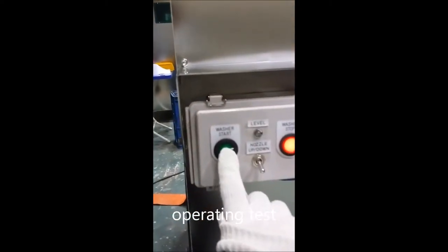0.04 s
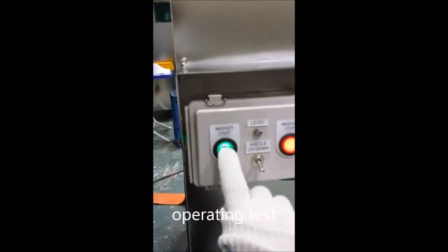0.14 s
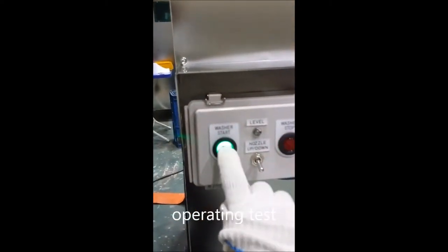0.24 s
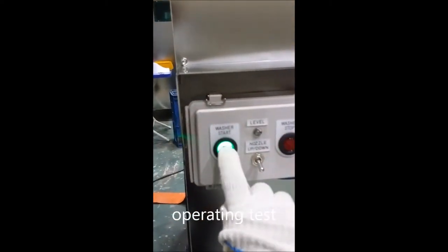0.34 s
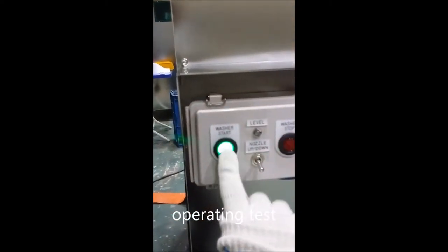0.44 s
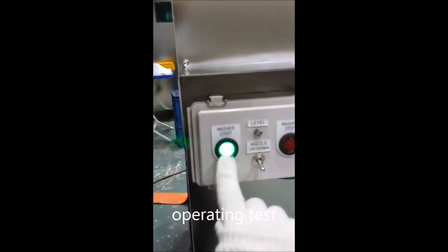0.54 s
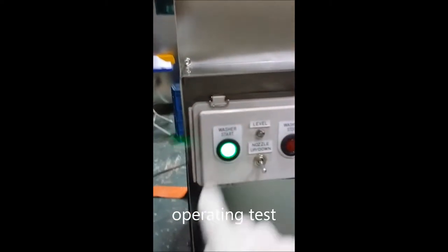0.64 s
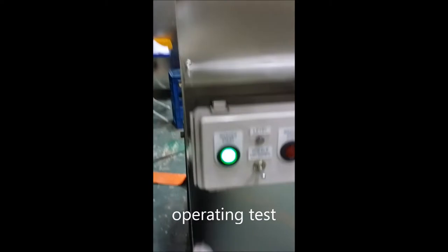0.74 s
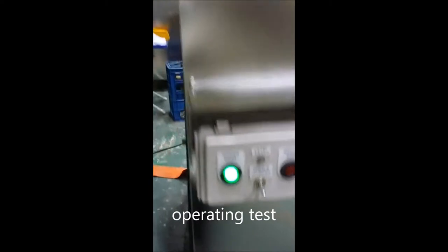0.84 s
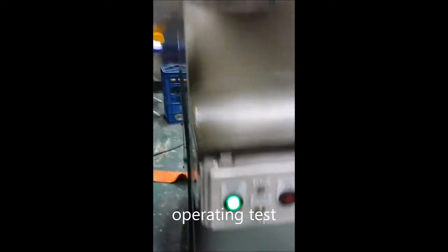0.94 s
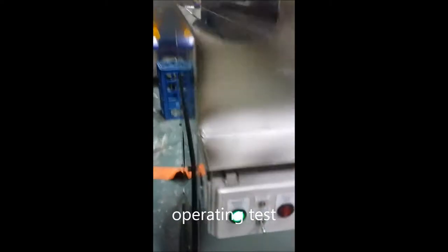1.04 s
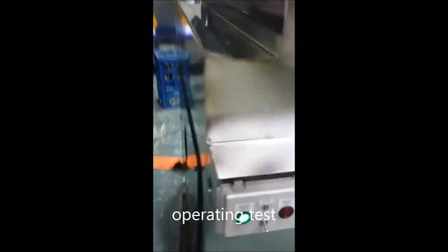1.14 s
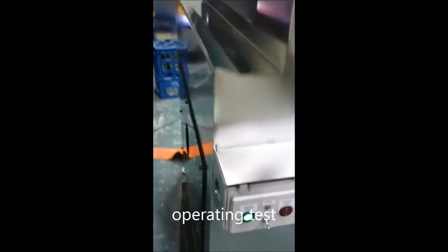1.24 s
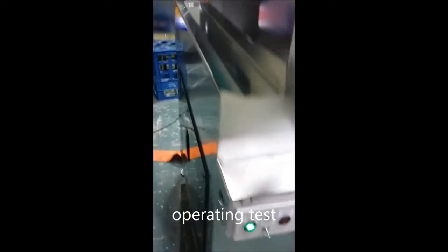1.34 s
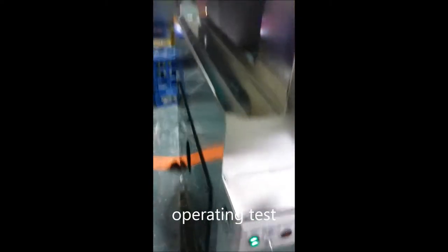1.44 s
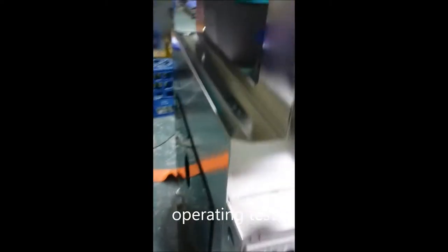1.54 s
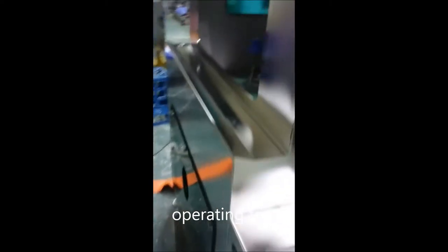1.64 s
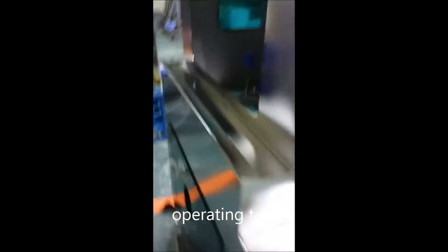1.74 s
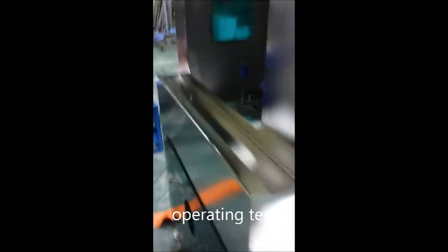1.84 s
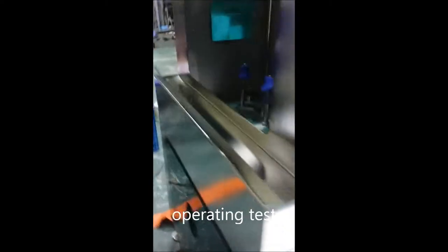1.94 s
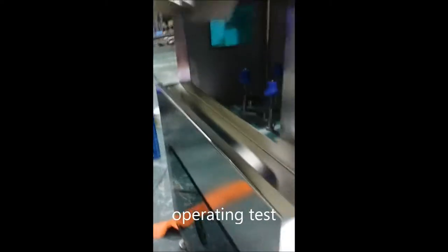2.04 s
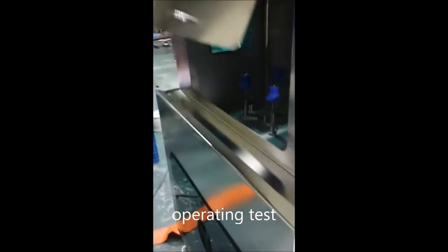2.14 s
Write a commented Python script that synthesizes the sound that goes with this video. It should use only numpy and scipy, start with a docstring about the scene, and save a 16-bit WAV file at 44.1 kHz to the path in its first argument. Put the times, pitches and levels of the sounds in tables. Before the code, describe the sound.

Washing machine switching on: clicking air burst, dull metal bang, then continuous bright spray hiss in a factory

```python
"""A washing machine in a factory hall is switched on.
Its pump motor hums, built from sine waves, over the rumble of the hall, which is shaped noise.
A burst of compressed air escapes (grainy noise) as a valve clicks (noise and taps set off resonances).
A cylinder bangs the steel cabinet, whose panels ring as fading sines.
The spray then hisses steadily: bright noise, cut into bands that each flicker a little."""
import sys
import numpy as np
from scipy import signal
from scipy.fft import rfft, irfft
from scipy.io import wavfile

SR = 44100
rng = np.random.default_rng(int(sys.argv[2]) if len(sys.argv) > 2 else 0)


def unload_audio(sound):
    """Save the sound as a 16-bit wav file, at the path given as the first command line argument."""
    columns = np.transpose(np.atleast_2d(sound))
    # keep every value between -1 and 1, then stretch to whole-number steps
    steps = np.round(np.clip(columns, -1, 1) * 32767)
    wavfile.write(sys.argv[1], SR, steps.astype(np.int16))


N = 97020  # length in samples, 2.2 s

# Main note of the pump hum. Each row: time in seconds, level in dB, left minus right in dB.
HUM = [(0, -38, -4), (.8, -37, -4), (1.07, -38.5, -4), (1.15, -40, -2.5), (1.4, -40, -.5), (1.9, -41, -1),
       (2.2, -39.5, -1)]
# Its overtones. Each row: time in seconds, levels of the 2nd, 3rd, 4th and 5th harmonic in dB before wavering.
OVERTONES = [(0, -67, -58.5, -67, -67), (.8, -63, -63, -61, -55), (1.07, -68, -62, -64, -62),
             (1.15, -55, -52, -68, -62), (1.4, -53.5, -50, -90, -60), (1.55, -65, -52.5, -62, -61),
             (1.72, -76, -52.5, -59, -49), (1.8, -81, -69, -77, -52), (1.95, -70, -53, -70, -63),
             (2.05, -61, -56.5, -64, -52.5), (2.2, -69, -50, -59, -47)]
# A faint second motor. Each row: time in seconds, level in dB.
WHINE = [(0, -58), (1.1, -57.5), (1.4, -64), (2.2, -72)]
HUM_HZ, WHINE_HZ, OVERTONE_WAVER_DB = 250.4, 850.6, 2
HUM_LEAD_S = 0.00024  # the left side runs ahead of the right

# How alike left and right noise are. Each row: pitch in Hz, likeness (1 same, 0 unrelated, below 0 opposed).
LIKENESS = [(60, 1), (130, 0.96), (290, 0.7), (640, 0.13), (1410, -0.12), (3100, 0.076), (6820, 0.15),
            (15000, 0.1)]

# Tone colour of far machinery. Each row: pitch in Hz, relative left and right strength in dB per Hz.
HALL_COLOUR = [(25, -34, -15), (50, -18, -10), (103, -5, -3.5), (185, -11.5, -16), (404, -14, -14.5),
               (696, -18, -16), (1480, -28, -15), (2030, -25, -20.5), (3400, -25, -22.5), (4760, -26, -32),
               (6500, -21.5, -26.5), (7700, -28, -31), (8850, -31, -21), (9900, -31, -32),
               (14700, -32.5, -33), (15400, -65, -60)]
HALL_DB = -43
# Rumble of the running machine. Each row: time in seconds, level in dB before its slow swelling.
RUMBLE = [(.5, -53.5), (.9, -55.5), (1.2, -54), (1.4, -54), (1.6, -58.5), (1.9, -44.5), (2.1, -50.5),
          (2.2, -48)]
# Tone colour of the rumble. Each row: pitch in Hz, relative left and right strength in dB per Hz.
RUMBLE_COLOUR = [(25, -14, 12), (49, -1, 1), (100, 0, -13), (169, 3, 15), (312, 10, 5.5), (496, -43, -16),
                 (1010, -6.5, -18), (2000, -19, -40)]
# Humps added to that colour. Each row: pitch in Hz, width in Hz, relative strength in dB per Hz.
RUMBLE_PEAKS = [(94, 12, -13), (135, 9.6, 11), (164, 10, -8)]
RUMBLE_SWELL_DB = 4.5

# Air burst. Each row: time in seconds, level in dB before graininess, extra dB for its lows, extra dB for its highs.
BURST = [(.1865, -40, -6, -3), (.1975, -38, -6, -6), (.199, -25.5, -12, -10), (.206, -22, -9, -5),
         (.209, -19, 0, 0), (.22, -17.2, 0, 3), (.245, -20, 1, 2), (.26, -22.5, 0, 1), (.28, -26, 0, 0),
         (.31, -30, 1, 0), (.35, -33.5, 2, -2), (.42, -38, 2, -4), (.5, -44, 3, -4)]
# Tone colour of the burst. Each row: pitch in Hz, relative left and right strength in dB per Hz.
BURST_COLOUR = [(496, -16, -7), (1030, -22, -6), (1670, -23, -14), (3050, -12.5, -13), (3570, -4.5, -6),
                (4250, -9, -5), (4970, -0.5, -6), (5600, -7, -10), (6150, 1.5, -15), (7100, -14, -5),
                (7800, 1, -19), (8360, -15, 0.5), (9300, -12, -11), (10700, -12.5, -11), (12300, -13, -15),
                (13800, -14, -14), (14500, -25, -30), (15300, -16, -24), (15800, -40, -40)]
# Broad whistles in the burst. Each row: pitch in Hz, width in Hz, relative strength in dB per Hz.
BURST_WHISTLES = [(6040, 270, -8.5), (4720, 100, -7), (11300, 160, -22)]
BURST_PATCHY_DB, BURST_GRAIN_DB, BURST_FADE_S = .8, 1.2, 0.037

# Valve clicks and knocks, and one low thud. Each row: start in seconds, peak level in dB, pitch of the first
# ring in Hz, time in seconds before the noise dies away, pitch of the second ring in Hz (higher or lower),
# its level in dB against the first ring.
CLICKS = [(.1866, -22, 3900, .002, 10000, -6), (.4453, -17.5, 4400, .004, 12400, -11),
          (.449, -22, 900, .005, 1800, 0), (.1986, -19, 6000, .004, 4000, -3),
          (.2082, -13, 6000, .003, 3900, -2), (.2122, -14, 6200, .001, 8500, -2),
          (.2192, -10, 4300, .002, 6000, -2), (.2385, -12, 6000, .002, 8300, -5),
          (.251, -16, 6100, .002, 4600, -5), (2.07, -34, 123, .03, 280, -18)]
CLICK_CYCLES = 11  # cycles for the first ring to fall by 60 dB; the second ring takes twice as many
CLICK_TAIL_S, CLICK_TAP = .0025, 4  # fading time of the noise; height of the tap

# Blows on the cabinet. Each row: start in seconds, strength in dB.
BLOWS = [(.208, -20), (0.451, -39)]
# Cabinet panels. Each row: pitch in Hz, dB against the blow before chance, seconds to fall by 60 dB
# when left undamped, swelling time in seconds.
CABINET = [(70, -13, 0.62, .01), (89.1, -15, 2.45, 0.018), (104.9, -7.5, 0.79, 0.012),
           (169.7, -19, 0.77, 0.063), (187, -16, 0.94, 0.064), (214, -3, .5, .08), (228, -3, .5, .08),
           (298.5, 2, .65, .025), (452, -10, .7, .04), (549, -12, .6, .03), (357, -12, 0.92, 0.015),
           (695.6, -17.5, 0.68, 0.03), (761, -17.5, 0.46, 0.0047), (872, -21, 0.94, 0.057),
           (1070, -26.5, 0.9, 0.013), (1464, -13, 0.19, 0.0033), (1747, -9.5, 0.25, 0.0066)]
CABINET_PAN_DB, PANEL_CHANCE_DB, PANEL_FLUTTER_DB = -3.5, 1, 2
DAMPED_S, DAMPED_DB, DAMPED_ABOVE_HZ = .432, -9, 150  # the upper panels are damped as the valve resets
# Tone colour of the rattle. Each row: pitch in Hz, relative left and right strength in dB per Hz.
RATTLE_COLOUR = [(40, -30, -1), (101, -2, -16), (230, -3.5, 4.5), (413, -17, -2.5), (537, 2.5, -5.5),
                 (810, -26, -25), (1710, -5, -4.5), (3150, -24, -28)]
RATTLE_DB, RATTLE_SWELL_S, RATTLE_T60_S = -24.5, .012, 1  # T60: seconds to fall by 60 dB

# Spray jets. Each row: time in seconds, level in dB before flicker, top against body in dB,
# low part against body in dB, left minus right of the middle in dB, left minus right of the highs in dB.
# The last two columns are used as swings around their own averages.
SPRAY = [(0.5, -36, -35, -7, 2.2, -0.5), (0.56, -37, -27, -7, 3.2, -3), (0.608, -36, -25, -10, 3, 1),
         (0.712, -37.5, -19, -9.5, 2.8, 1.5), (1.11, -36, -17, -13, 0.54, -1.5),
         (1.328, -38, -18, -11.5, 1.9, -3), (1.796, -38.5, -19, -10.5, 2, 1.5),
         (1.886, -37.5, -23, -15.5, 6.5, -2), (1.996, -37, -26, -14.5, 2.7, -4),
         (2.086, -34.5, -22, -11, 2.1, -3), (2.2, -37, -24, -11, 2.0, -4)]
# Tone colour of the jets. Each row: pitch in Hz, relative left and right strength in dB per Hz.
SPRAY_COLOUR = [(357, -12.5, -4), (935, -19, -12.5), (1604, -10.5, -1), (2140, -11.5, -11.5),
                (3170, -11, -9.5), (4300, -10.5, -9), (4970, -7, -8), (5490, -0.5, -10), (6250, -11, -14),
                (6610, -7, -9), (7000, 3, -11.5), (7340, -4, -4), (8300, -8.5, -4.5), (8000, -18.5, -5),
                (9400, -15, -8), (9800, -23, -13), (10300, -23, -16), (10400, -28, -16),
                (15000, -28, -21.5), (15300, -60, -38), (15600, -70, -60)]
# Broad whistles in the jets. Each row: pitch in Hz, width in Hz, relative strength in dB per Hz.
SPRAY_WHISTLES = [(2490, 150, -11), (3500, 140, -4), (4680, 220, -4)]
SPRAY_PATCHY_DB, SPRAY_FLICKER_HZ = 1.9, 3.5
SPRAY_TOP_DB, SPRAY_LOW_DB = -17.5, -9  # usual top and low part against the body

MIC_LOW_HZ, CUTOFF_HZ = 48.6, 15800


def from_db(db):
    """Turn decibels into a plain gain."""
    return 10 ** (np.asarray(db) / 20)


def rms_one(x):
    """Scale a sound to an rms level of 1."""
    return x / np.sqrt(np.mean(x ** 2) + 1e-20)


def in_time(rows):
    """Draw straight lines between the rows, giving each column a value at every sample."""
    seconds, *columns = np.transpose(rows)
    return [np.interp(np.arange(N) / SR, seconds, column) for column in columns]


def at_hz(points, hz):
    """Read a table between its pitches, on a logarithmic pitch scale."""
    pitches, values = np.transpose(points)
    return np.interp(np.log(hz), np.log(pitches), values)


def panned(db):
    """Give the left and right gains for a left-right difference."""
    return from_db(np.multiply.outer([.5, -.5], db))


def drift(rate):
    """Wander slowly by chance, with spread 1: noise smoothed twice, with its corner at rate in Hz."""
    step = 40  # one slow value for every 40 samples
    r = np.exp(-2 * np.pi * rate * step / SR)
    white = rng.standard_normal(N // step + 2002)
    slow = signal.lfilter([1], [1, -2 * r, r * r], white)[2000:]  # drop the filter's warm-up
    return np.interp(np.arange(N) / step, np.arange(len(slow)), rms_one(slow))


def ring(push, hz, t60):
    """Set a resonance going: a unit click starts a sine that falls by 60 dB in t60 seconds."""
    r, w = from_db(-60 / (t60 * SR)), 2 * np.pi * hz / SR
    return signal.lfilter([0, np.sin(w)], [1, -2 * r * np.cos(w), r * r], push + 1e-18)


def noise(colour, peaks=()):
    """Make the spectrum of coloured stereo noise with rms 1, and list its frequencies."""
    hz = np.maximum(np.fft.rfftfreq(N, 1 / SR), 1)
    mid, side = rfft(rng.standard_normal((2, N)))
    alike = np.clip(at_hz(LIKENESS, hz), -1, 1)
    pitches, *sides = np.transpose(colour)
    levels = [np.interp(np.log(hz), np.log(pitches), db) for db in sides]
    power = from_db(levels) ** 2 * (hz > 20)
    for peak_hz, width, db in peaks:
        power = power + from_db(db) ** 2 / (1 + (2 * (hz - peak_hz) / width) ** 2) ** 2
    # Shared noise makes the sides alike; noise of opposite sign sets them apart.
    pair = np.sqrt(1 + alike) * mid + np.sqrt(1 - alike) * side * [[1], [-1]]
    both = np.sqrt(power) * pair
    return both / np.sqrt(np.mean(irfft(both, N) ** 2)), hz


def patchy(both, hz, patchy_db, rate, count):
    """Split noise into overlapping bands, count to an octave, each flickering on its own."""
    steps = np.arange(10 * count, 14 * count + 1)  # centres from 1024 to 16384 Hz
    place = np.clip(count * np.log2(hz), steps[0], steps[-1])  # the end bands take in the rest
    bands = []
    for step in steps:
        weight = np.maximum(1 - abs(place - step), 0)
        bands.append(from_db(patchy_db * drift(rate)) * irfft(both * weight, N))
    return 2 ** (steps / count), bands


def hum():
    """A pump tone of fixed pitch with a few wavering overtones, and a faint whine, all sines."""
    db, pan = in_time(HUM)
    t = np.arange(N) / SR + [[HUM_LEAD_S], [0]]
    tone = from_db(db) * np.sin(2 * np.pi * HUM_HZ * t)
    for harmonic, level in enumerate(in_time(OVERTONES), start=2):
        gain = from_db(level + OVERTONE_WAVER_DB * drift(5.7))
        tone = tone + gain * np.sin(2 * np.pi * harmonic * HUM_HZ * t)
    whine = from_db(in_time(WHINE)[0]) * np.sin(2 * np.pi * WHINE_HZ * t)
    return np.sqrt(2) * (tone * panned(pan) + whine)  # root 2 gives a sine an rms of 1


def hall():
    """Steady noise of far machinery, and the swelling rumble of this machine from the first blow on."""
    far = from_db(HALL_DB) * irfft(noise(HALL_COLOUR)[0], N)
    gain = from_db(in_time(RUMBLE)[0] + RUMBLE_SWELL_DB * drift(7.4))
    rumble = gain * irfft(noise(RUMBLE_COLOUR, RUMBLE_PEAKS)[0], N)
    fade_in = np.clip((np.arange(N) / SR - BLOWS[0][0]) / 0.035, 0, 1)
    return far + rumble * fade_in


def burst():
    """Compressed air rushing out of the valve, as grainy noise; the middle of its band speaks first."""
    t = np.arange(N) / SR
    db, low_db, high_db = in_time(BURST)
    gate = (t > BURST[0][0]) * np.exp(-np.maximum(t - BURST[-1][0], 0) / BURST_FADE_S)
    both, hz = noise(BURST_COLOUR, BURST_WHISTLES)
    centres, bands = patchy(both, hz, BURST_PATCHY_DB, rate=130.0, count=2)
    air = 0
    for centre, band in zip(centres, bands):
        air = air + band * from_db(low_db * (centre < 3300) + high_db * (centre > 9000))
    return air * gate * from_db(db + BURST_GRAIN_DB * drift(160))


def clicks():
    """Valve clicks: a tap and a short buzz of noise set two resonances ringing."""
    t, out, white = np.arange(N) / SR, 0, rng.standard_normal((2, N))
    for start, db, hz, length, second_hz, second_db in CLICKS:
        alike = np.clip(at_hz(LIKENESS, hz), 0, 1)
        fade = (t >= start) * np.exp(-np.maximum(t - start - length, 0) / CLICK_TAIL_S)
        puff = (alike * white[0] + (1 - alike) * white) * fade
        puff[:, int(start * SR) + 1] = CLICK_TAP
        t60 = CLICK_CYCLES / hz
        first = rms_one(ring(ring(puff, hz, t60), hz, t60))  # ringing twice softens the start
        second = rms_one(ring(puff, second_hz, 2 * CLICK_CYCLES / second_hz))
        sound = first + from_db(second_db) * second
        out = out + from_db(db) * sound / np.abs(sound).max()
    return out


def cabinet():
    """Each blow makes the panels swell and ring as fluttering sines; a dull noise rattle dies away behind."""
    chance = rng.standard_normal((len(BLOWS), len(CABINET)))
    out, t = np.zeros(N), np.arange(SR) / SR  # each ring is one second long
    for (start, strength), luck in zip(BLOWS, chance):
        i = int(start * SR)
        for (hz, level, t60, swell), own in zip(CABINET, luck):
            db = strength + level + PANEL_CHANCE_DB * own
            db = db + PANEL_FLUTTER_DB * drift(11)[:SR] - 60 * t / t60
            shape = (1 - np.exp(-t / swell)) * from_db(db)
            if hz > DAMPED_ABOVE_HZ and start < DAMPED_S:
                shape = shape * from_db(DAMPED_DB * np.clip((t + start - DAMPED_S) / .02, 0, 1))
            out[i:i + SR] -= (shape * np.sin(2 * np.pi * hz * t))[:N - i]
    after = np.arange(N) / SR - BLOWS[0][0]
    fade = from_db(RATTLE_DB - 60 * np.maximum(after, 0) / RATTLE_T60_S)
    rattle = irfft(noise(RATTLE_COLOUR)[0], N) * np.clip(after / RATTLE_SWELL_S, 0, 1) * fade
    return out * panned([CABINET_PAN_DB]) + rattle


def spray():
    """Smooth bright jets of noise with a few broad whistles; they turn as the listener moves."""
    db, top_db, low_db, pan_middle, pan_high = in_time(SPRAY)
    both, hz = noise(SPRAY_COLOUR, SPRAY_WHISTLES)
    centres, bands = patchy(both, hz, SPRAY_PATCHY_DB, SPRAY_FLICKER_HZ, count=6)
    out = 0
    for centre, band in zip(centres, bands):
        pan = pan_high if centre > 6200 else pan_middle * (centre > 2500)  # the lows do not turn
        top = (top_db - SPRAY_TOP_DB) * (centre > 10000)
        low = (low_db - SPRAY_LOW_DB) * (centre < 3300)
        out = out + band * panned(pan - pan.mean()) * from_db(top + low)
    fade_in = np.clip((np.arange(N) / SR - BLOWS[0][0]) / 0.011, 0, 1)
    return out * from_db(db) * fade_in


def scene():
    """Add all the sounds together."""
    return hum() + hall() + burst() + clicks() + cabinet() + spray()


def record(dry):
    """The microphone loses the deepest bass; the top is cut steeply."""
    bass_cut = signal.butter(2, MIC_LOW_HZ, "high", fs=SR, output="sos")
    top_cut = signal.ellip(10, .5, 70, CUTOFF_HZ, fs=SR, output="sos")
    return signal.sosfilt(top_cut, signal.sosfilt(bass_cut, dry))


dry = scene()
out = record(dry)
unload_audio(out)
```